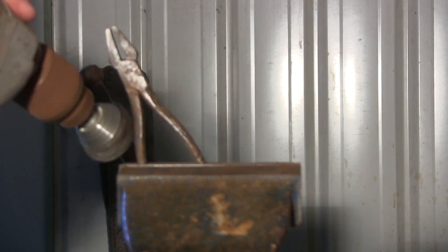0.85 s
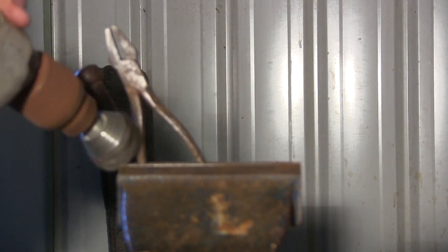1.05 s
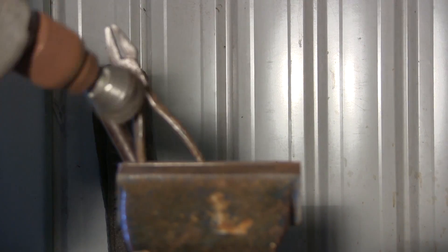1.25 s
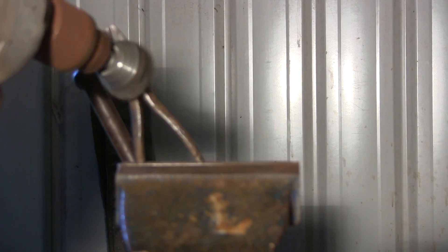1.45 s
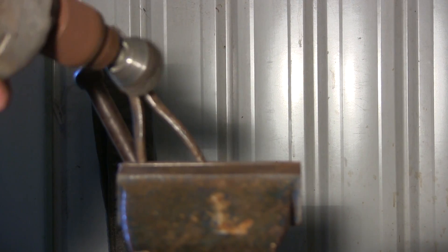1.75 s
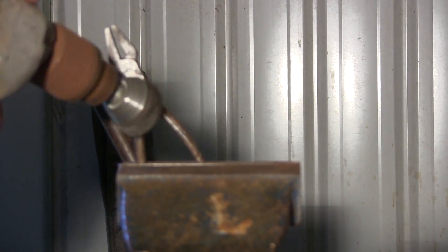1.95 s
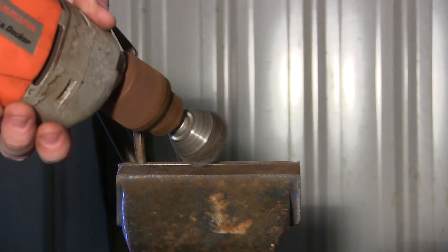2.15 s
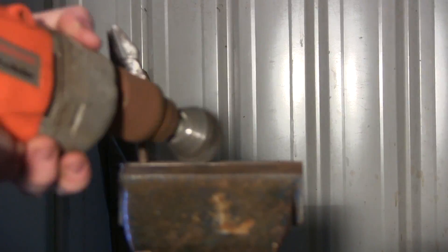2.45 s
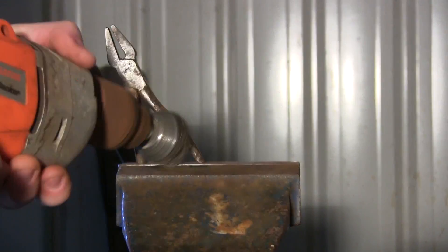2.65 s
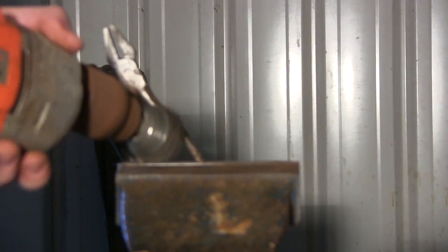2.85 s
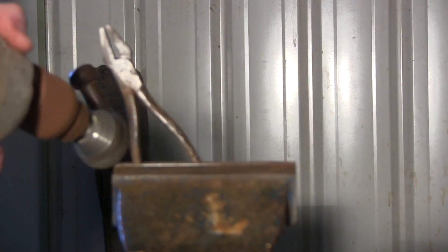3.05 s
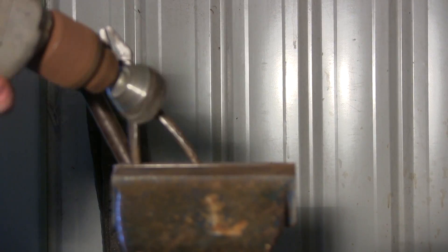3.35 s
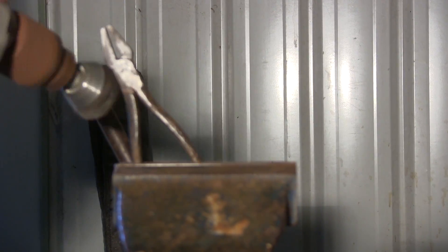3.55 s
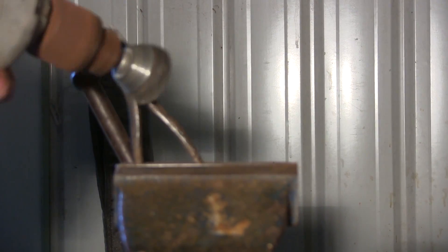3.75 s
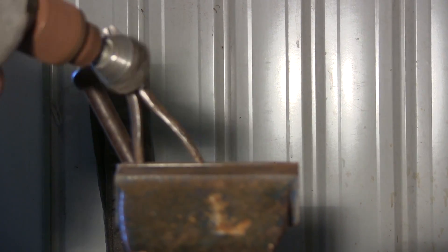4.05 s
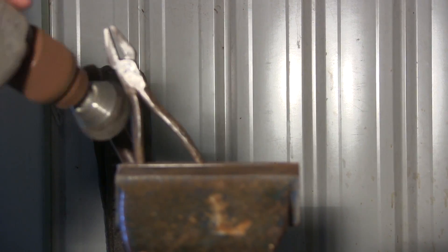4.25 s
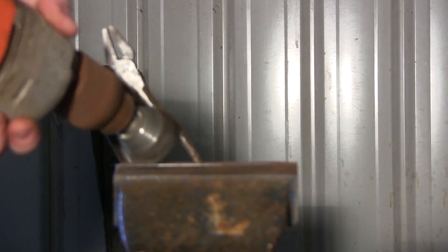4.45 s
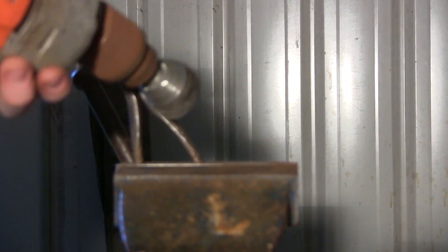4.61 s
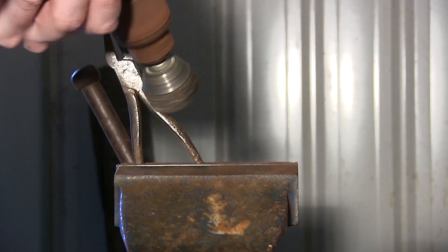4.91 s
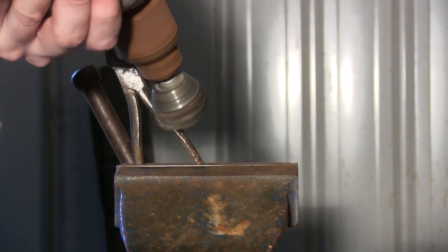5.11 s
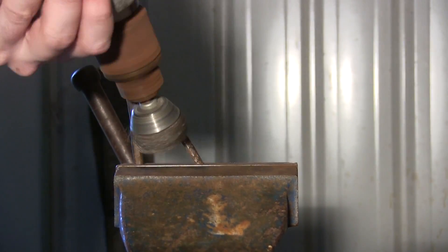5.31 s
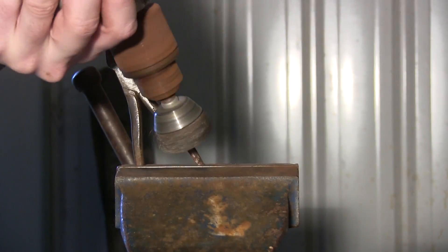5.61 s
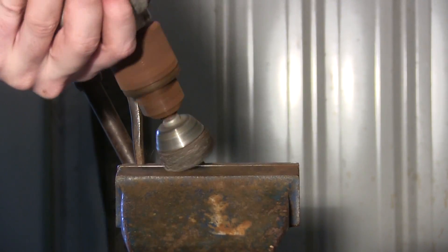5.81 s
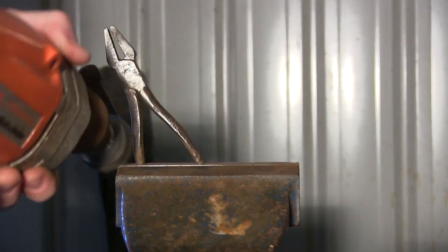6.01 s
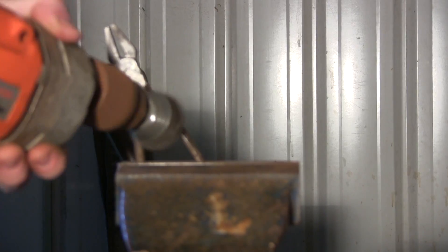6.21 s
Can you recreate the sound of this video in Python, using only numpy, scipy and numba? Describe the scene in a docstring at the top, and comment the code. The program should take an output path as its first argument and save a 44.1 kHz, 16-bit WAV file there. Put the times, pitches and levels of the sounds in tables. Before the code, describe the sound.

An electric drill spins a wire brush against rusty pliers in a vise, hissing brightly with a whine that sags under load.

```python
"""A bright hiss and a sagging whine, close up in a tin shed: a mains drill spins a wire cup brush
against rusty pliers clamped in a vise. Fan and brush hiss through the housing; gears and commutator
whine and drop in pitch under load. Whenever the brush bites, its wire tufts beat the pliers and vise,
which ring low, and single wires ping the jaw. The colour shifts as the drill swings round in the hand."""
import sys
import numpy as np
from scipy import signal
from scipy.fft import rfft, irfft, next_fast_len
from scipy.io import wavfile
from scipy.ndimage import uniform_filter1d, map_coordinates
from numba import njit

SR = 44100
rng = np.random.default_rng(int(sys.argv[2]) if len(sys.argv) > 2 else 0)


def waveform_to_disk(signal):
    """Save audio, clipped to [-1, 1], as 16-bit WAV at the path in sys.argv[1]."""
    frames = np.transpose(np.atleast_2d(signal))
    scaled = np.clip(frames, -1, 1) * 32767
    samples = np.round(scaled).astype(np.int16)
    wavfile.write(sys.argv[1], SR, samples)


N = 280898
FFT_SIZE = next_fast_len(N + SR // 2)
FREQ = np.fft.rfftfreq(FFT_SIZE, 1 / SR)
FREE_MESH_HZ = 3156.4  # gear pitch with no load
GRAZE_DB = -62  # wire tips still touch between strokes


def hiss(force, turned, flicker_db=.9, grain_db=.55, thinning_db=-5):
    """Grainy wire and air noise through the housing; each octave band flickers on its own."""
    # Hiss loudness: time_s, level_db
    loudness = [(0.0, -20.5), (0.82, -19), (0.87, -17.5), (1.06, -20), (2.13, -18.5), (2.15, -20),
                (3.69, -19), (3.76, -16.5), (3.83, -19.5), (4.4, -18), (4.84, -22.5), (5.0, -18.5),
                (5.2, -21.5), (5.53, -19.5), (5.75, -20), (5.82, -20), (6.28, -23.5), (6.37, -18.5)]
    # Hiss colour: frequency_hz, relative_db
    colour = [(150, -42), (480, -35), (900, -29.5), (1900, -22.5), (2400, -13), (3100, -10.5), (4500, -7),
              (6500, -5.5), (8100, -2), (15700, -5)]
    grit = rng.standard_normal(N) * undb(grain_db * walk(900))
    octave = np.clip(np.log2(FREQ / 1000 + 1e-9), 0, 4)
    lifted = undb(GRAZE_DB) / force  # 1 while the brush spins free, which thins the lows
    noise = 0
    for k in range(5):
        band = np.clip(1 - abs(octave - k), 0, 1) * undb(across(colour))
        flicker = undb(flicker_db * (.56 * walk(9) + walk(24.816)))
        noise += undb(thinning_db * lifted / 4 ** k) * flicker * through(grit, band)
    facing, away = (through(noise, undb(db)) for db in housing_lifts())
    return undb(curves(loudness)[0]) * level((1 - turned) * facing + turned * away, 0)


def housing_lifts():
    """Colour of the drill housing in dB at every frequency: facing the listener, then turned away."""
    # Resonances and dips: centre_hz, width_hz, facing_db, away_db
    modes = [(2950, 300, 5, 3), (3420, 150, -6, -7), (3970, 260, -7.5, -7.5), (4270, 150, 4, 4),
             (4780, 400, 3, 1.5), (5420, 260, -6, -6), (6020, 130, 5.5, 4), (6560, 200, 3, 3),
             (7000, 120, 4, 5), (8300, 500, 3, 0), (7750, 250, -2.5, -1), (9060, 250, -3, -4),
             (9440, 260, 3, 8.5), (10150, 200, -3, -3), (10600, 250, 4, 1.5), (11650, 300, -3, -4),
             (12800, 200, -6, -4), (13500, 600, 1.5, 1.5), (15350, 450, 3.5, 1.5)]
    return [sum(row[side] * abs(ring(row[0], row[1])) ** 2 for row in modes) for side in (2, 3)]


def housing_ring(width_hz=330):
    """Air noise sings in the strongest housing resonance, which wanders as the grip shifts."""
    # Path of the resonance: time_s, pitch_hz, level_db
    path = [(0, 8320, -29.5), (.74, 8280, -29.5), (1.0, 8320, -29.5), (1.5, 8440, -30.5), (1.75, 8530, -29),
            (1.95, 8320, -31), (3.2, 8303, -31), (3.6, 8254, -32.5), (4.05, 8393, -28.5),
            (4.42, 8450, -28.5), (4.5, 7874, -31), (4.9, 8216, -34), (5.38, 8363, -37), (5.53, 8360, -29),
            (5.72, 8350, -40), (5.9, 8156, -32), (6.37, 8200, -35.5)]
    hz, db = curves(path)
    air = gliding_ring(rng.standard_normal(N), hz + 40 * walk(14), width_hz)
    return undb(db + walk(22.09)) * level(gliding_ring(air, hz, 2 * width_hz), 0)


def whine(mesh_hz, turned, gear_lift_db, commutator_ratio=4.688, away_loss_db=10):
    """Gear and commutator tones locked to the shaft; weaker ones swell across housing resonances."""
    # Weaker whines: mesh_multiple, base_db
    overtones = [(2, -43.5), (2.438, -53), (4, -49), (4.876, -45), (5, -39.5)]
    # Commutator whistle, faintest at top speed: pitch_hz, base_db
    whistle_by_pitch = [(13050, -36), (13600, -32), (14000, -33), (14350, -40), (14800, -40)]
    # Swells of that whistle: time_s, lift_db
    whistle_swells = [(0, -4), (.45, -1), (.75, 0), (1.0, -1), (1.35, 1), (1.6, -4), (1.9, 1), (2.3, 0),
                      (2.6, 0), (3.0, 4), (3.5, 1), (3.9, -7), (4.1, 5), (4.4, -2), (4.64, 10), (4.74, -6),
                      (5.0, -6), (5.12, 0), (5.33, -5), (5.56, -9), (5.63, 3), (5.73, 2), (5.8, -6),
                      (6.37, -8)]
    cycles = np.cumsum(mesh_hz) / SR

    def tone(multiple):
        return np.sqrt(2) * np.sin(2 * np.pi * multiple * cycles + .08 * multiple * walk(60))
    # the teeth sing louder the more the motor sags
    gear_db = -40 + 1.5 * (FREE_MESH_HZ - mesh_hz) / 100 + gear_lift_db
    out = undb(gear_db + 1.2 * walk(30)) * tone(1)
    whistle_db = np.interp(commutator_ratio * mesh_hz, *np.transpose(whistle_by_pitch))
    whistle_db += curves(whistle_swells)[0]
    out += undb(whistle_db + 1.6 * walk(25) + walk(7)) * tone(commutator_ratio)
    lifts = housing_lifts()
    for multiple, db in overtones:
        facing, away = (np.interp(multiple * mesh_hz, FREQ, lift) for lift in lifts)
        housing_db = 1.5 * ((1 - turned) * facing + turned * away)
        out += undb(db + housing_db - away_loss_db * turned + 1.4 * walk(10)) * tone(multiple)
    return out


def motor(drag_hz, lag_s=.07, opening_sag_hz=236):
    """Gear mesh pitch in Hz: the heavy rotor follows the drag late."""
    inertia = np.exp(-1 / (lag_s * SR))
    sag_hz = signal.lfilter([1 - inertia], [1, -inertia], drag_hz, zi=[opening_sag_hz])[0]
    return FREE_MESH_HZ - sag_hz


def brush_strokes(press_s=.045, lift_s=.04, slide_s=.016):
    """The hand presses the brush on: motor drag, bite force and the tuning of the spot it touches."""
    # Strokes; where the brush bears on the handles sets their free length and so their two rings:
    # start_s, end_s, drag_from_hz, drag_to_hz, bite_from_db, bite_to_db,
    # upper_ring_hz, lower_ring_hz, low_rings_db, jaw_db (the last two relative to the bite)
    strokes = [(-0.05, 0.251, 258.0, 316.0, -41.5, -45.5, 1355, 508, -14, -12.5),
               (0.248, 0.608, 386, 352.0, -41, -40.5, 1330, 520, -14, -6),
               (0.612, 0.758, 300, 241.5, -47, -44.0, 1380, 518, -8, -10),
               (0.851, 0.959, 137, 190, -57, -48, 1550, 513, -5, -15.0),
               (0.958, 1.051, 192, 251.5, -47, -45.5, 1396, 518.6, -9, -15.0),
               (1.088, 1.225, 69, 190, -54, -42.5, 1375, 664, -8, -16.0),
               (1.23, 1.293, 180, 245, -39, -45, 1530, 503.4, -9, -16.0),
               (1.29, 1.337, 250, 288.5, -42, -42, 1388, 520, -9, -16.0),
               (1.352, 1.55, 256, 295, -45, -48, 1543, 650, -14, -8.0),
               (1.553, 1.665, 293, 310.5, -45, -44, 1632, 650.5, -12.5, -1),
               (1.66, 1.85, 220, 137.0, -41.5, -56, 1375, 581.4, -13, -14),
               (1.886, 2.021, 0.49, 145.0, -65, -55, 1329, 617.5, -3, -8.5),
               (2.09, 2.24, 149.0, -0.5, -37.5, -55, 1370, 520.6, -12.5, -13),
               (2.202, 2.326, 260, 61.0, -56, -35.5, 1377, 531.6, -12.5, 1),
               (2.326, 2.553, 89, 235.5, -53, -37.5, 1302, 516, -8, -15),
               (2.553, 2.816, 264, 231.0, -44, -37, 1267, 514, -8.5, -13),
               (2.894, 3.077, 102, 214.5, -34, -38, 1481, 534, -9.5, -4),
               (3.158, 3.427, 125, 279.0, -38, -41.5, 1397, 523.6, -10.5, -3),
               (3.498, 3.637, 134, 353.5, -41, -35.5, 1330, 521.2, -14.5, -5),
               (3.724, 3.809, 101, 302.5, -26.5, -37.5, 1416, 631, -9, -7),
               (3.812, 3.96, 550, 290.5, -33.5, -46.5, 1289, 634, -10, -3),
               (4.034, 4.194, 44.5, 136, -48, -43, 1462, 538, -11, -2),
               (4.283, 4.373, 230, 1.5, -26, -52, 1373, 511, -14.5, -12),
               (4.523, 4.735, 56, 156.5, -57, -49, 1509, 672, -13.5, 4),
               (4.779, 4.865, 597, 42.5, -40, -50, 1319, 621, -11, 3),
               (4.951, 5.17, 96, 443, -41, -43, 1409, 512, -12.5, 3.5),
               (5.177, 5.357, 447, 280, -43, -42.5, 1400, 608, -17, 4.5),
               (5.518, 5.731, 500, 190.5, -39.5, -45, 1318, 598, -16.5, 4),
               (5.817, 6.052, 112, 157.5, -58, -47, 1490, 633, -19, 3),
               (6.062, 6.271, 99, 211, -50, -47, 1502, 641, -17, 1)]
    t = np.arange(N) / SR
    start, end, drag_from, drag_to, db_from, db_to, *spots = np.transpose(strokes)[:, :, None]
    since, length = t - start, end - start
    contact = np.clip(np.minimum(since / press_s, 1 + (length - since) / lift_s), 0, 1)
    along = np.clip(since / length, 0, 1)
    drag_hz = np.sum(contact * (drag_from + (drag_to - drag_from) * along), axis=0)
    force = undb(GRAZE_DB) + np.sum(contact ** 2 * undb(db_from + (db_to - db_from) * along), axis=0)
    latest = np.clip(np.searchsorted(start[:, 0], t) - 1, 0, None)
    spot = [uniform_filter1d(column[latest, 0], int(slide_s * SR)) for column in spots]
    return drag_hz, force, spot


def brush_bite(mesh_hz, force, spot, turned, tufts_per_mesh=.0428, chatter_db=2.6):
    """One blow per passing tuft, trailed by loose wire scratches, rings the pliers and vise."""
    # Low rings of pliers and vise: pitch_hz, width_hz, gain_db
    low_modes = [(274, 80, -3), (363, 120, -3), (613, 130, 7), (858, 116, 5.5), (1030, 40, 6.5)]
    # Their higher rings: pitch_hz, width_hz, gain_db
    high_modes = [(1344, 65, 5), (1492, 190, 7), (1687, 270, 1.5)]
    # Hard bites as the brush skips on the metal: start_s, strength_db
    skips = [(0.965, -32), (1.1394, -32), (1.8567, -26.5), (2.6366, -32), (3.065, -27.5), (5.0, -32),
             (5.055, -30), (5.228, -26), (5.2729, -23), (5.352, -20.5), (5.6, -34), (5.645, -30), (6, -32)]
    upper_hz, lower_hz, low_db, jaw_db = spot
    tufts = tufts_per_mesh * np.cumsum(mesh_hz) / SR
    impacts = np.diff(np.floor(tufts), prepend=0)
    blows = level(impacts * undb(1.5 * rng.standard_normal(N)), 0)
    wires = level(rng.standard_normal(N) * np.exp(-(tufts % 1) / 2.7), 0)
    scrape = force * undb((1.2 + chatter_db * turned) * walk(40))  # chatters more side-on
    knocks = hit_envelope(skips, rise_s=.005, fall_s=.011, trim_db=-10)
    # the low rings take more of the tufts, the high ones more of the single wires
    low_drive = blows + undb(-3 + 10.5 * turned) * wires
    high_drive = blows + undb(6 + 2 * turned) * wires
    thud = (scrape + undb(3) * knocks) * undb(low_db)
    low = pliers(low_drive, thud, low_modes, lower_hz, width_hz=28., handle_db=9.3)
    high = pliers(high_drive, scrape + knocks, high_modes, upper_hz,
                  width_hz=30., handle_db=19 - 8 * turned)
    crunch = undb(-4) * through(knocks * wires, ring(2400, 1400))
    return low + high + jaw_ping(wires, force, jaw_db) + crunch


def pliers(drive, envelope, modes, handle_hz, width_hz, handle_db):
    """Steady modes of pliers and vise plus a handle's gliding ring; the envelope sets the level."""
    body = sum(undb(db) * ring(hz, width) for hz, width, db in modes)

    def resonate(x):
        return through(x, body) + undb(handle_db) * gliding_ring(x, handle_hz, width_hz)
    return resonate(envelope * drive) / np.std(resonate(drive))


def jaw_ping(wires, force, jaw_db, pitch_hz=3670, width_hz=115):
    """The jaw rings brightly under the scraping wires and pings when a single one strikes it."""
    # Single wire strikes: start_s, strength_db
    strikes = [(2.3411, -27), (2.6693, -33), (3.0783, -24), (3.1699, -26), (3.2894, -27), (3.6485, -34),
               (3.7517, -28), (3.9843, -23.5), (4.0472, -24), (4.1844, -31), (4.2896, -30), (5.7036, -33),
               (6.1205, -26)]
    scrape = force * undb(jaw_db + 1.5 * walk(60))
    pings = hit_envelope(strikes, rise_s=.002, fall_s=.009, trim_db=-6)
    makeup = np.sqrt(SR / np.pi / width_hz)  # noise keeps its level through the narrow ring
    return through((scrape + pings) * wires, makeup * ring(pitch_hz, width_hz))


def wavering_tone():
    """A thin near-sine that glides and wavers on its own."""
    # Its glide: time_s, pitch_hz, level_db
    glide = [(1.03, 832, -82), (1.09, 822, -53), (1.18, 800, -68), (1.25, 808, -56), (1.41, 876, -51),
             (1.52, 901, -59), (1.8, 862, -60), (2.08, 803, -65), (2.3, 802, -74), (2.42, 833, -57),
             (2.55, 884, -82)]
    hz, db = curves(glide)
    amplitude = np.sqrt(2) * undb(db + 1.2 * walk(25))
    return amplitude * np.sin(2 * np.pi * np.cumsum(hz) / SR + .75 * walk(40))


def stereo_space(x, near_t60_s=.06, spread_t60_s=.25, drift_s=.00007):
    """Direct sound, close treble echoes and a diffuse stereo spread; the paths drift with the hand."""
    # Colour of the stereo spread, a short diffuse tail, wide in lows and treble, nearly mono at 2-3 kHz:
    # frequency_hz, gain_db
    spread_colour = [(300, -7), (700, -3), (1290, -7), (1900, -20), (3300, -19), (4600, -7), (8120, -9.5),
                     (15000, -7)]
    # Stereo lean: frequency_hz, left_minus_right_db
    lean = [(200, 7), (380, 5), (700, 2.5), (1290, -1), (4400, 0.4), (15000, 1.7)]
    t = np.arange(SR // 2) / SR

    def echo(t60_s):
        tail = rng.standard_normal(len(t)) * np.exp(-np.log(1000) * t / t60_s)
        return rfft(tail / np.sqrt(np.sum(tail ** 2)), FFT_SIZE)
    drifting = map_coordinates(x, [np.arange(N) + drift_s * SR * walk(3)], mode="mirror")
    treble = 1 - 1 / (1 + (FREQ / 4000) ** 4)
    mid = x + through(drifting, undb(-10) * echo(near_t60_s) * treble)
    side = through(drifting, echo(spread_t60_s) * undb(across(spread_colour) - 1.2))
    left_gain = undb(across(lean) / 2)
    return np.array([through(mid, left_gain) + side, through(mid, 1 / left_gain) - side])


def noise_floor(noise_db=-76.5, hum_hz=701, hum_db=-73):
    """Faint low capsule noise, unrelated left and right, and a steady hum."""
    rumble = through(rng.standard_normal((2, N)), 1 / (1 + (FREQ / 300) ** 2))
    hum = undb(hum_db) * np.sqrt(2) * np.sin(2 * np.pi * hum_hz * np.arange(N) / SR)
    return level(rumble * undb(.84 * walk(2.6)), noise_db) + hum


def hit_envelope(hits, rise_s, fall_s, trim_db):
    """Force of short hits, each peaking at its strength plus the trim."""
    start_s, db = np.transpose(hits)
    impulses = np.zeros(N)
    impulses[(start_s * SR).astype(int)] = undb(db + trim_db)
    t = np.arange(SR // 8) / SR
    shape = (1 - np.exp(-t / rise_s)) * np.exp(-t / fall_s)
    return signal.fftconvolve(impulses, shape / shape.max())[:N]


def ring(hz, width_hz):
    """Response of one resonance, 1 at its centre."""
    return 1j * FREQ * width_hz / (hz ** 2 - FREQ ** 2 + 1j * FREQ * width_hz)


@njit
def gliding_ring(x, hz, width_hz):
    """State-variable band-pass whose centre moves every sample."""
    out, band_state, low_state = np.empty(len(x)), 0., 0.
    for i in range(len(x)):
        tuning, damping = np.tan(np.pi * hz[i] / SR), width_hz / hz[i]
        band = (band_state + tuning * (x[i] - low_state)) / (1 + tuning * (tuning + damping))
        band_state = 2 * band - band_state
        low_state += 2 * tuning * band
        out[i] = damping * band
    return out


def walk(rate_hz):
    """Smooth random wobble with a spread near 1."""
    hold = int(SR / rate_hz)
    steps = np.repeat(rng.standard_normal(N // hold + 1), hold)
    return 1.474 * uniform_filter1d(uniform_filter1d(steps, hold), hold)[:N]


def curves(table):
    """Columns of a time table, one value a sample."""
    time_s, *columns = np.transpose(table)
    return [np.interp(np.arange(N) / SR, time_s, column) for column in columns]


def across(table):
    """An EQ curve in dB, read at every frequency."""
    hz, db = np.transpose(table)
    return np.interp(np.log(FREQ + 1), np.log(hz), db)


def through(x, gain):
    """Filter by a gain for every frequency."""
    return irfft(rfft(x, FFT_SIZE) * gain, FFT_SIZE)[..., :N]


def level(x, db):
    """Set the rms level."""
    return x * undb(db) / np.sqrt(np.mean(x ** 2))


def undb(db):
    """Gain of a dB value."""
    return 10 ** (np.asarray(db) / 20)


def scene(low_cut_hz=417):
    """Drill, brush and ringing metal, spread in stereo over a faint noise floor."""
    # The drill swings in the hand: time_s, vents_turned (0 facing, 1 away), gear_lift_db
    swing = [(0, 0, -1), (.4, 0, 2.5), (1.6, 0.3, -1), (2.1, 0.1, -1.5), (2.25, 0, 1.5), (3.9, 0, 1.5),
             (4.04, 0, -5), (4.25, 0.01, -1), (4.42, 0, 2.5), (4.52, 1, -10), (4.8, 0.2, -3),
             (5.3, 0.17, -2.5), (5.45, 0.2, 1), (5.73, 0.68, -2), (5.92, 0.4, -1), (6.37, 0.86, -9)]
    turned, gear_lift_db = curves(swing)
    drag_hz, force, spot = brush_strokes()
    mesh_hz = motor(drag_hz)
    drill = hiss(force, turned) + housing_ring() + whine(mesh_hz, turned, gear_lift_db)
    stereo = stereo_space(drill + brush_bite(mesh_hz, force, spot, turned) + wavering_tone())
    # the small microphone capsules lose the bass; their own noise stays
    low_cut = signal.butter(3, low_cut_hz, "high", fs=SR, output="sos")
    return signal.sosfilt(low_cut, stereo) + noise_floor()


def record(dry):
    """The camera cuts the top steeply."""
    top_hz = 15730
    return signal.sosfilt(signal.ellip(12, .2, 80, top_hz, fs=SR, output="sos"), dry)


dry = scene()
out = record(dry)
waveform_to_disk(out)
```